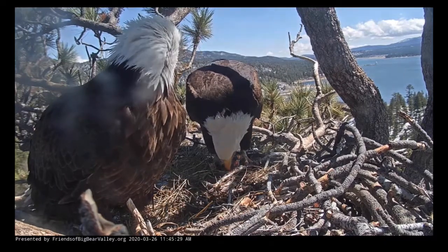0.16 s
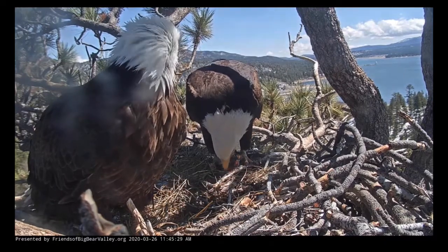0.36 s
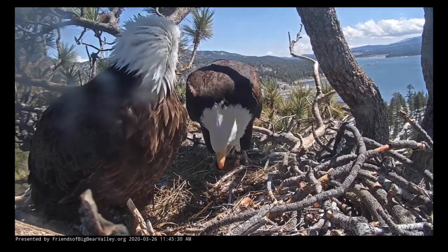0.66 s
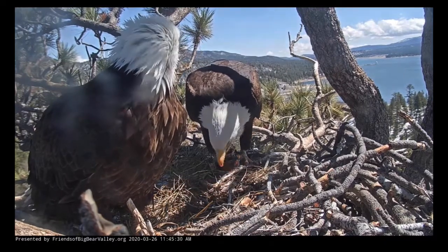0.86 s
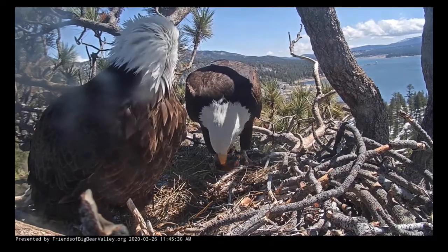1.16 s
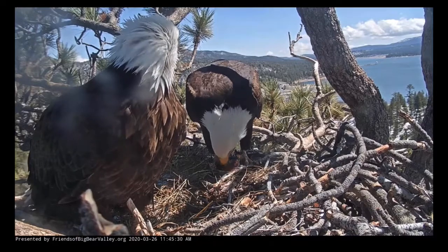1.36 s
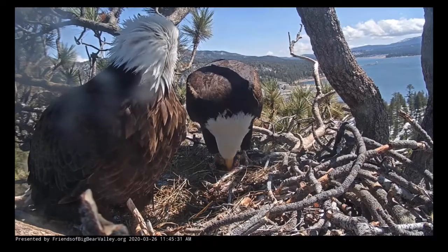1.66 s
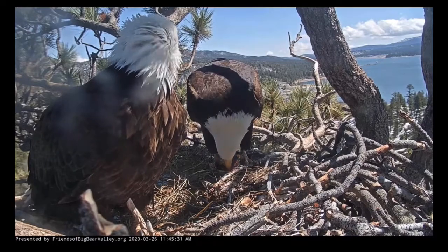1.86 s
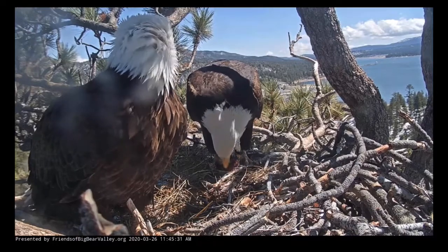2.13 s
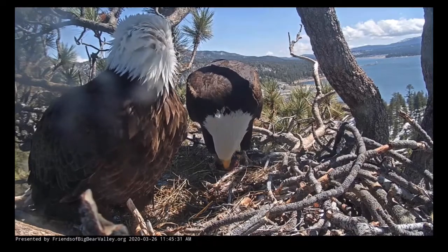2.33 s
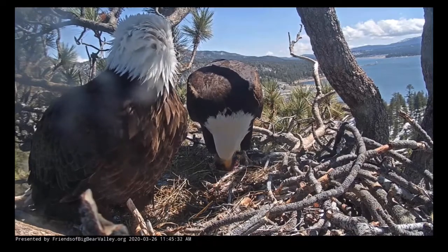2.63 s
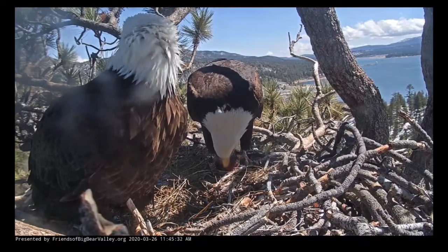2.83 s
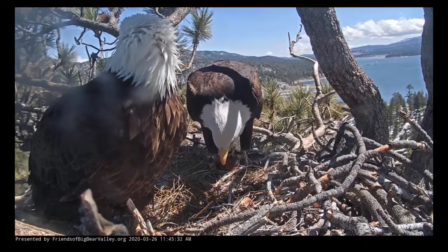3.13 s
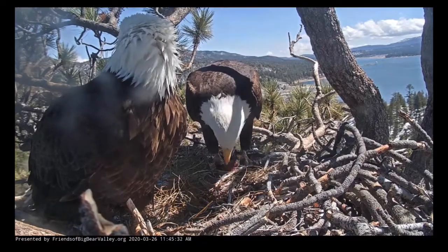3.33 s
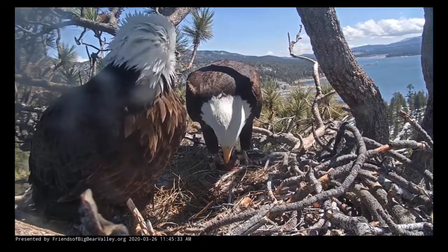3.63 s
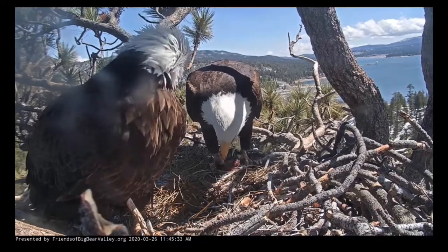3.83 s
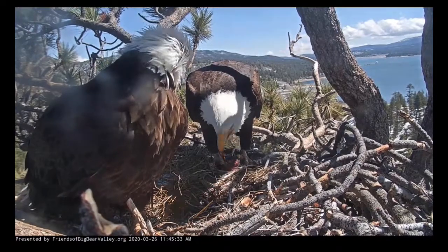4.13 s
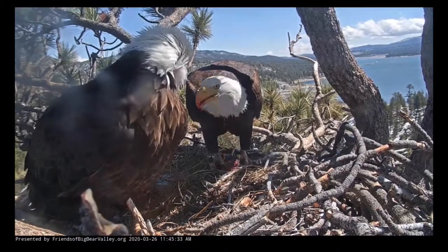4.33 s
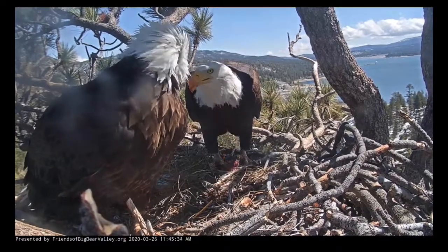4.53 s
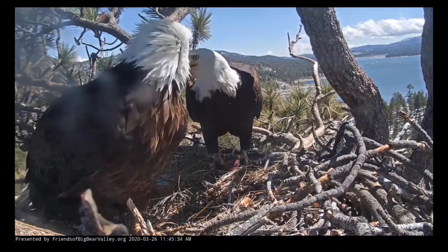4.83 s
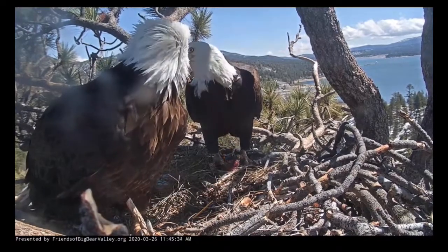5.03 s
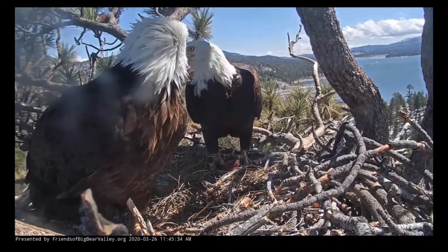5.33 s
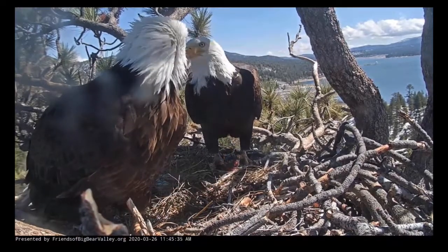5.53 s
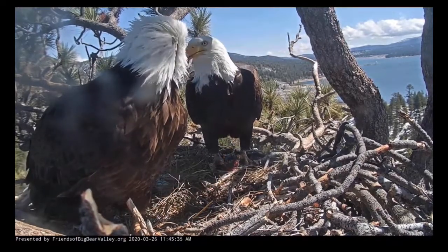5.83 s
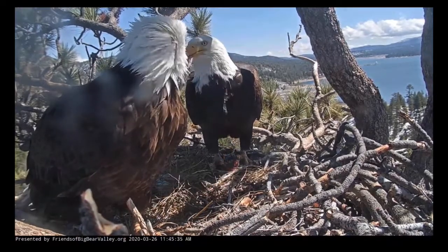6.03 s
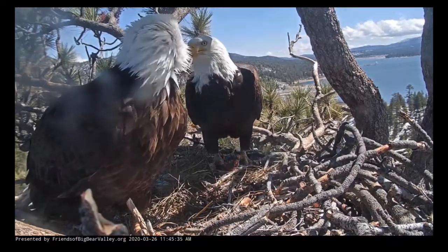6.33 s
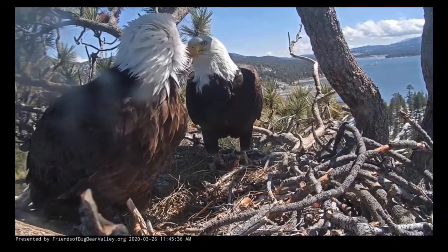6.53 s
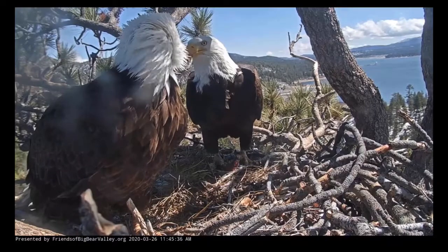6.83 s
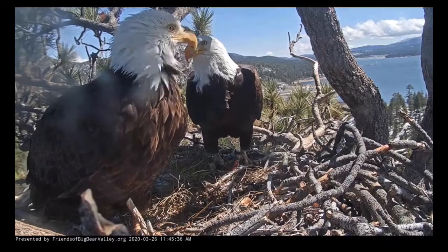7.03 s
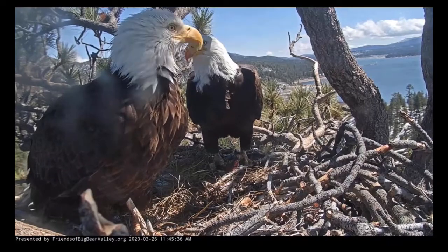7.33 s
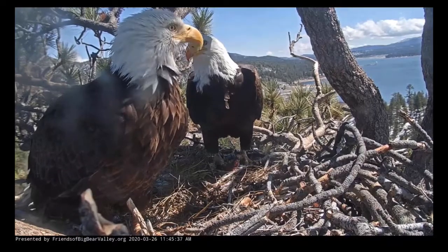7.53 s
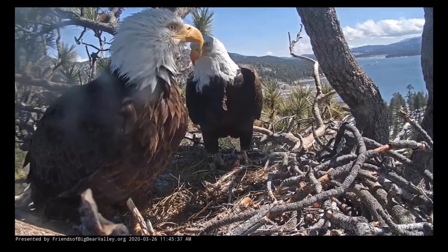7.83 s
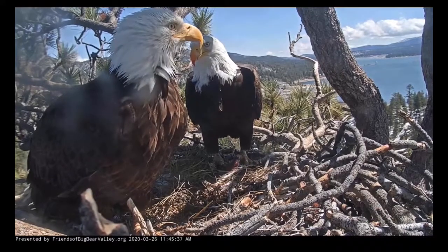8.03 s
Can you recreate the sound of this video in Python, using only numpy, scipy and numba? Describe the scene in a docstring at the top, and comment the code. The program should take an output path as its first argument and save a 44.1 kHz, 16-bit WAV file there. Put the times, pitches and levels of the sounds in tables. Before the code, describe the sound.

Short, high, buzzy chirps lead into a series of raspy eagle calls, with constant wind hiss behind them.

```python
"""Eagles at the nest

Two eagles on a stick nest in a pine give faint buzzy chirps, then eight hoarse calls, in which irregular
pulses of the syrinx and rushing air excite the throat's resonances. Among the calls come a two-voiced
whistle, a distant hoot and two twig knocks. Wind hisses in the needles and rumbles on a small microphone,
which adds its own hiss and whose housing favours 3 kHz."""
import sys
import numpy as np
from scipy import signal
from scipy.fft import rfft, irfft, next_fast_len
from scipy.io import wavfile
from scipy.ndimage import uniform_filter1d
from numba import njit

SR = 44100
rng = np.random.default_rng(int(sys.argv[2]) if len(sys.argv) > 2 else 0)


def master(y):
    """Save y as 16-bit WAV."""
    cut = np.clip(np.atleast_2d(y).T, -1, 1)
    pcm = np.round(cut * 32767)  # scale
    wavfile.write(sys.argv[1], SR, pcm.astype(np.int16))


N = 360738
T = np.arange(N) / SR

# Hoarse calls: (start [s], attack [s], length [s], level [dB], swell [dB], accent delay [s], accent [dB],
# beak open after [s], beak opening [dB], treble [dB], hoarseness [dB], resonance shift [%])
CALLS = [(3.654, 0.11, 0.5, -44, -2.5, 0.23, 1.5, 0, 2, -2.5, 4, -1.1),
         (4.464, 0.098, 0.43, -43, -2, 0.3, 3, .02, 1, -1, 0.5, -0.49),
         (5.018, 0.16, .46, -41, -1.5, 0.29, 3.5, .1, 1.5, -1, 1.5, .3),
         (5.677, 0.069, 0.36, -44, 1, 0.15, 3, .03, 2, -2, -3, 0.057),
         (6.229, 0.12, 0.376, -41, -3, .12, -0.5, 0, 0, -1.5, 6.5, -.6),
         (6.771, 0.077, .37, -41.5, 0, .17, 2, .04, 0.5, -4.5, 1, -0.26),
         (7.345, 0.093, 0.35, -37, -2.5, 0.22, 2, 0, 0.5, 0, -7.5, 1),
         (7.899, 0.1, 0.36, -39, -1.5, 0.13, 0, 0, 1.5, -0.5, -5, 0.77)]
# Throat resonances: (centre [Hz], bandwidth per pass [Hz], gain [dB], change over a call [dB],
# share of hoarseness [ratio])
FORMANTS = [(2097, 300, -11.5, -4.5, 0.031), (2635, 410, -9, -3, 0.68), (3136, 440, -0.5, 5, 0),
            (3770, 590, -17, 5, 0.63), (4150, 370, -12, 1, 0.29), (4610, 480, -25, -8, 1.1),
            (5530, 410, -23, -4, 0.18), (5950, 270, -29.5, -2, 1.4), (6300, 350, -20.5, -0.5, 0),
            (7000, 940, -34.5, -11, 1.2), (7920, 540, -32.5, -4, 0.26)]
# Buzzy chirps: (start [s], level [dB], resonance [Hz], length [s])
CHIRP_NOTES = [(1.112, -31, 3270, 0.081), (1.25, -34, 3230, .084), (1.38, -31.5, 3270, 0.055),
               (1.447, -42, 3250, 0.11), (1.537, -39, 3180, .09), (1.58, -44, 3140, .078),
               (1.647, -37, 3130, 0.081), (1.783, -39, 3200, .09), (1.804, -36, 3230, 0.079),
               (1.868, -44, 3240, .082), (1.985, -44, 3270, 0.079), (2.326, -36.5, 3110, 0.11),
               (2.45, -44, 3200, .074), (3.114, -39, 3200, 0.12), (3.563, -41, 3130, 0.074)]
# Whistle contour: (time [s], pitch [Hz], level [dB], second voice relative to first [dB])
WHISTLE_CONTOUR = [(4.05, 1452, -61, -12), (4.075, 1504, -43.5, -8), (4.15, 1483, -46.5, -2.5),
                   (4.2, 1499, -44, -8), (4.255, 1445, -48.5, 0), (4.285, 1396, -56, -6),
                   (4.341, 1320, -55, -5.5)]
# Hoot contour: (time [s], pitch [Hz], level [dB])
HOOT_CONTOUR = [(5.79, 224, -76), (5.85, 226, -73), (5.92, 232, -64), (6.0, 223, -70), (6.05, 222, -74.5)]
# Twig impacts: (time [s], initial level [dB], ring frequency [Hz])
TWIG_IMPACTS = [(5.6953, -33, 1200), (7.646, -34.5, 1140)]
# Thin tick: (time [s], level before filtering [dB])
TICK_IMPULSE = [(1.9163, -32.5)]
# Hiss spectrum as the housing colours it: (frequency [Hz], relative density [dB])
HISS_SPECTRUM = [(71, -44), (120, -19.5), (350, -12.5), (550, -8.5), (900, -4.5), (1250, -3.5),
                 (1500, -5.5), (1800, -3), (2200, -5.5), (2700, -2.5), (3200, 3.5), (3600, -3.5),
                 (4300, -16), (5000, -25), (5500, -22), (6400, -23), (7000, -27.5), (9000, -29.5),
                 (13000, -29.5), (15000, -39)]
# Hiss envelope: (time [s], level [dB])
HISS_LEVEL = [(0.0, -44.5), (1.0, -46), (1.6, -45), (2.3, -45), (3.0, -45), (4.3, -45), (5.3, -45),
              (6.6, -45.5), (8.18, -45)]
# Spectrum of gusts on the housing: (frequency [Hz], relative density [dB])
RUMBLE_SPECTRUM = [(8.8, -31), (15, 12), (49, -0.5), (86, 2), (166, -7.5), (217, -7), (250, -3),
                   (320, -44.5), (550, -120)]
# Gust envelope: (time [s], level [dB])
RUMBLE_LEVEL = [(0, -77), (1.4, -75), (1.65, -71), (2.1, -74), (3.3, -74), (3.75, -69), (4.0, -61),
                (4.17, -54), (4.28, -61), (4.4, -66), (4.67, -62), (4.85, -69), (6.0, -65.5), (7.2, -67),
                (7.36, -65), (7.8, -64.5), (8.0, -60.5), (8.18, -59)]


def syrinx_source():
    """Aperiodic vibration: chaotic flaps of the syrinx give uneven pulses, and rushing air adds noise."""
    flap_hz, jitter, scatter_db, air_db = 1060, .12, 3.0, 5.0
    timing, strength = rng.standard_normal((int(N / SR * flap_hz * 1.5), 2)).T
    at = np.cumsum(SR / flap_hz * np.exp(jitter * timing)).astype(int)
    flaps = np.zeros(N)
    flaps[at[at < N]] = undb(scatter_db * strength[at < N])
    return unit(flaps - flaps.mean()) + undb(air_db) * rng.standard_normal(N)


def hoarse_calls():
    """Source and filter: the syrinx drives throat resonances, shaded as the beak opens, then narrows."""
    onset_db, end_db, release_s = -11.5, -14.5, 0.071
    shut_db, opening_s, narrowing_db = -9, .04, 4
    sag, arch = 0.036, 0.1  # the resonances sink through a call, along an arched path
    source = syrinx_source()
    effort, progress, beak_db, hoarse_db, treble_db, shift = np.zeros((6, N))
    for (start, attack, length, db, swell_db, accent_s, accent_db,
         open_s, open_db, top_db, rough_db, percent) in CALLS:
        age = T - start
        shape_db = np.interp(age, [0, attack, length - release_s, length],
                             [onset_db, -swell_db / 2, swell_db / 2, end_db])
        shape_db += accent_db * np.exp(-.5 * ((age - accent_s) / (.12 * length)) ** 2)
        effort += undb(db + shape_db) * gate(start, start + length + 0.018, 0.04)
        now = (T >= start) & (T < start + length + 0.016)
        progress[now] = age[now] / length - .5  # zero in mid call
        shut = np.clip((open_s - age[now]) / opening_s, 0, 1)
        beak_db[now] = open_db + shut_db * shut - narrowing_db * progress[now]
        hoarse_db[now], treble_db[now], shift[now] = rough_db, top_db, percent / 100
    voice = np.zeros(N)
    for k, (hz, width, db, change_db, share) in enumerate(FORMANTS):
        centre = hz * (1 + shift - sag * progress - arch * progress ** 2)
        ring = bandpass(source, centre, float(width))
        ring = bandpass(ring, centre, float(width))  # a second pass deepens the valleys
        in_core = 2450 < hz < 3400  # the beak leaves these resonances alone
        opening_db = 0 if in_core else beak_db + (hz > 5000) * treble_db
        gain_db = db + share * hoarse_db + change_db * progress + opening_db + 0.65 * drift(12)
        voice += (-1) ** k * unit(ring) * undb(gain_db)
    return voice * effort * undb(0.39 * drift(30))


def chirps():
    """Resonant selection: only those harmonics of a pulse train that lie near one resonance sound."""
    buzz_hz, width_hz = 254.6, 210
    harmonic = np.arange(8, 18)[:, None]
    wobble = 1 + .007 * drift(120)
    husk = 1 + .25 * drift(250)
    out = np.zeros(N)
    for start, db, hz, length in CHIRP_NOTES:
        span = np.arange(int(start * SR), int((start + length) * SR))
        progress = np.linspace(0, 1, len(span))
        phase = phase_of(buzz_hz * wobble[span] * (1 - 0.11 * (progress - .3) ** 2))
        weight = np.exp(-.5 * ((harmonic * buzz_hz - hz) / width_hz) ** 2)
        partials = weight * np.cos(harmonic * phase + .5 * harmonic ** 2)  # offsets smear the pulses
        envelope = np.sin(np.pi * progress ** 0.41) ** 2  # starts fast, trails off
        out[span] += undb(db) * envelope * husk[span] * partials.sum(0) / weight.sum()
    return out


def whistle():
    """Beating: the two sides of a syrinx sound close in pitch, over a weak subharmonic an octave below."""
    beat_hz, subharmonic_db = 73, -11
    hz, db, second_db = curves(WHISTLE_CONTOUR)
    phase = phase_of(hz * (1 + 0.003 * drift(60)))
    second_voice = undb(second_db) * np.sin(phase + 2 * np.pi * beat_hz * T)
    tone = np.sin(phase) + second_voice + undb(subharmonic_db) * np.sin(phase / 2)
    sounding = gate(WHISTLE_CONTOUR[0][0], WHISTLE_CONTOUR[-1][0], 0.0129)
    return np.sqrt(2) * tone * undb(db + .8 * drift(40)) * sounding


def hoot():
    """Pure tone: a soft, distant hoot is one low sinusoid gliding slightly in pitch."""
    hz, db = curves(HOOT_CONTOUR)
    sounding = gate(HOOT_CONTOUR[0][0], HOOT_CONTOUR[-1][0], .02)
    return np.sqrt(2) * np.sin(phase_of(hz)) * undb(db) * sounding


def twig_knocks(t60_s=0.012):
    """Damped vibration: a struck twig rings in one mode that decays exponentially."""
    out = np.zeros(N)
    for start, db, hz in TWIG_IMPACTS:
        age = np.maximum(T - start, 0)
        out += undb(db - 60 * age / t60_s) * np.sin(2 * np.pi * hz * age)
    return out


def tick():
    """Impulse response: a click stripped of all but its treble is heard as a thin tick."""
    impulse = np.zeros(N)
    for start, db in TICK_IMPULSE:
        impulse[int(start * SR)] = undb(db)
    return signal.sosfilt(signal.butter(6, 8000, "high", fs=SR, output="sos"), impulse)


def wind():
    """Broadband noise: needles and microphone hiss, while gusts buffet the housing in the bass."""
    sway_hz, sway_width_hz, sway_db = 12.6, 8.8, -74  # a steady deep flutter under the gusts
    hiss = coloured_noise(HISS_SPECTRUM) * undb(curves(HISS_LEVEL)[0] + .5 * drift(5))
    sway = unit(bandpass(rng.standard_normal(N), np.full(N, sway_hz), sway_width_hz)) * undb(sway_db)
    rumble = coloured_noise(RUMBLE_SPECTRUM) * undb(curves(RUMBLE_LEVEL)[0] + drift(20))
    return hiss + sway + rumble


def undb(db):
    """Amplitude ratio of a level in decibels."""
    return 10 ** (np.asarray(db) / 20)


def unit(x):
    """Normalisation to rms 1."""
    return x / np.sqrt(np.mean(x ** 2))


def phase_of(hz):
    """Phase in radians as the time integral of frequency."""
    return 2 * np.pi * np.cumsum(hz) / SR


def curves(table):
    """Linear interpolation of a table's columns in time."""
    times, *columns = np.transpose(table)
    return [np.interp(T, times, column) for column in columns]


def gate(start, end, fade_s):
    """Window with raised-cosine edges."""
    return np.sin(np.pi / 2 * np.clip(np.minimum(T - start, end - T) / fade_s, 0, 1)) ** 2


def coloured_noise(spectrum):
    """Spectral shaping of white noise, scaled to rms 1."""
    hz, db = np.transpose(spectrum)
    size = next_fast_len(N)
    bin_hz = np.maximum(np.arange(size // 2 + 1) * SR / size, 1)
    gain = undb(np.interp(np.log(bin_hz), np.log(hz), db))
    return unit(irfft(rfft(rng.standard_normal(size)) * gain, size)[:N])


def drift(rate_hz):
    """Random modulation of rms 1: held values, smoothed twice."""
    hold = int(SR / rate_hz)
    steps = np.repeat(rng.standard_normal(N // hold + 1), hold)
    return unit(uniform_filter1d(uniform_filter1d(steps, hold), hold)[:N])


@njit
def bandpass(x, centre_hz, width_hz):
    """Second-order resonance in state-variable form, with gain 1 at its moving centre."""
    y, band_state, low_state = np.empty(len(x)), 0., 0.
    for i in range(len(x)):
        tuning, damping = np.tan(np.pi * centre_hz[i] / SR), width_hz / centre_hz[i]
        band = (band_state + tuning * (x[i] - low_state)) / (1 + tuning * (tuning + damping))
        band_state = 2 * band - band_state
        low_state += 2 * tuning * band
        y[i] = damping * band
    return y


def scene():
    """Superposition: the pressures of all sources add in one channel."""
    return (hoarse_calls() + chirps() + whistle() + hoot() + twig_knocks() + tick() + wind())[None]


def record(dry, cutoff_hz=15050):
    """Band limiting: a steep low-pass filter removes the highest treble."""
    return signal.sosfilt(signal.ellip(10, .2, 60, cutoff_hz, fs=SR, output="sos"), dry)


dry = scene()
out = record(dry)
master(out)
```